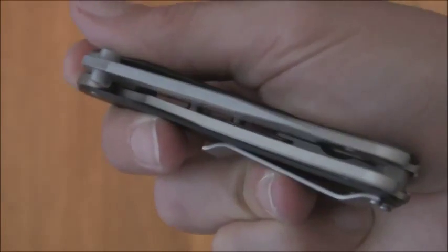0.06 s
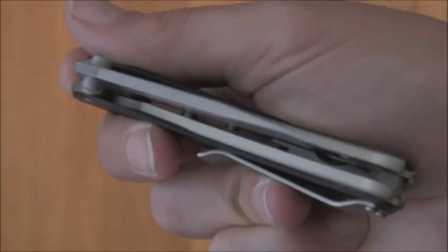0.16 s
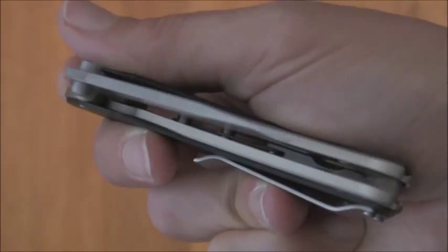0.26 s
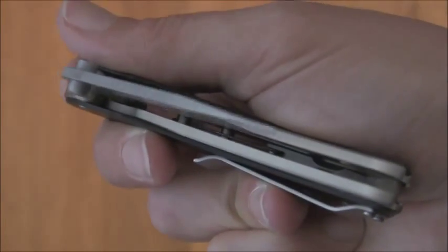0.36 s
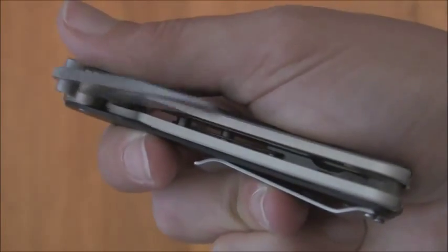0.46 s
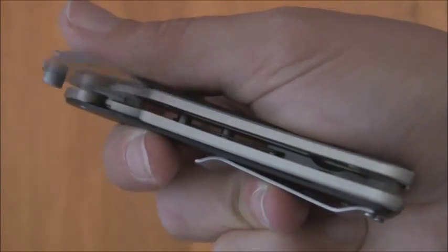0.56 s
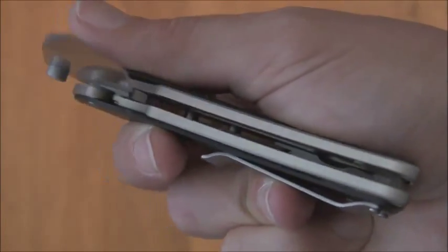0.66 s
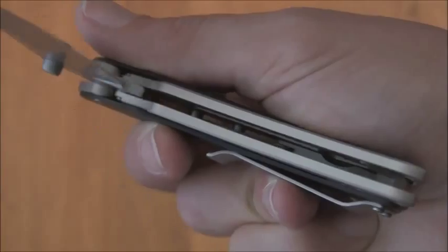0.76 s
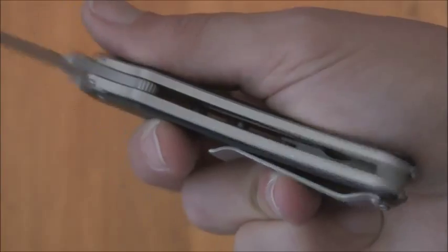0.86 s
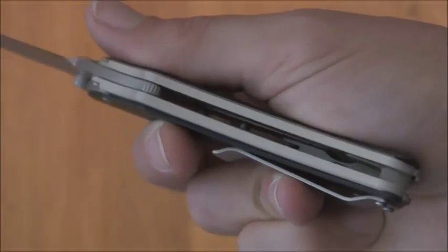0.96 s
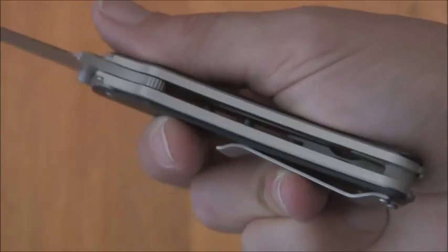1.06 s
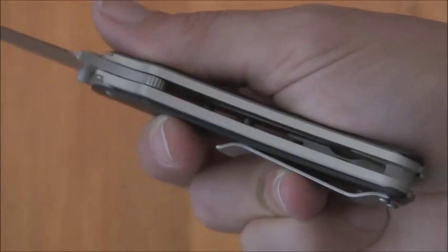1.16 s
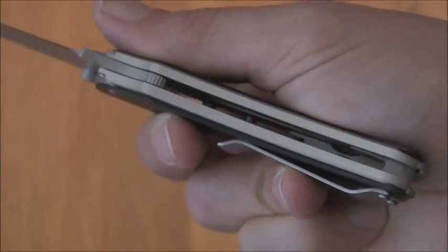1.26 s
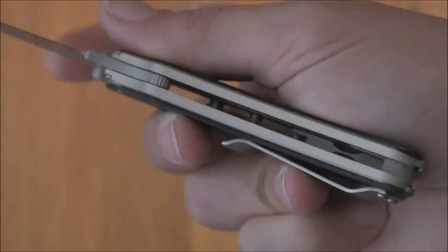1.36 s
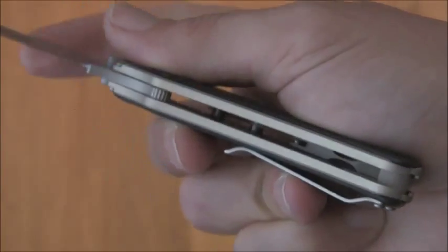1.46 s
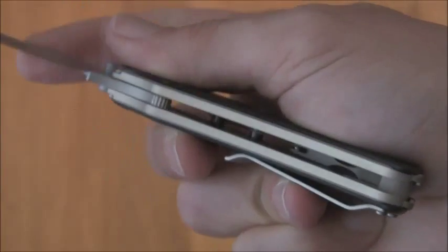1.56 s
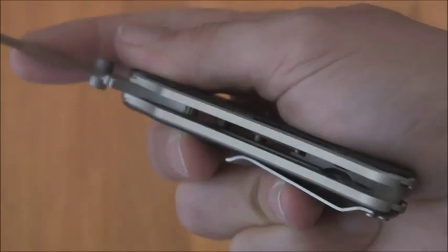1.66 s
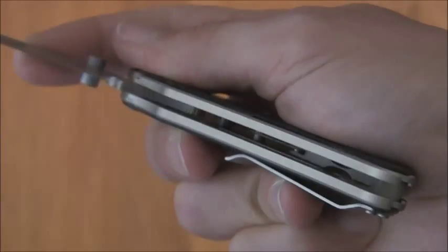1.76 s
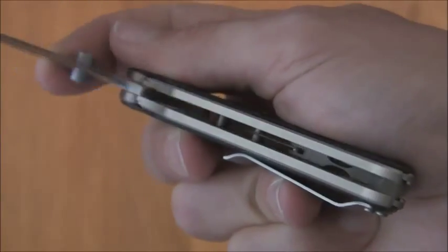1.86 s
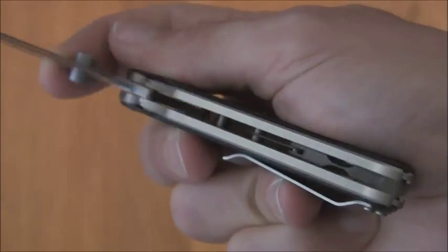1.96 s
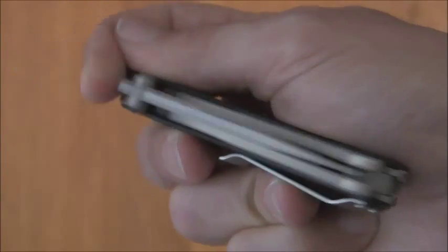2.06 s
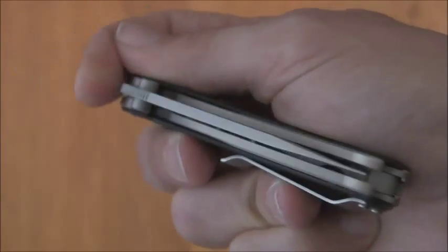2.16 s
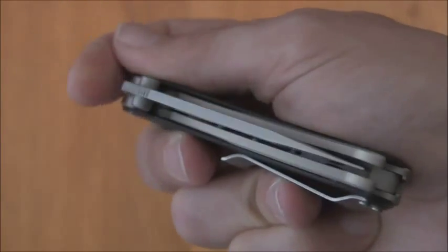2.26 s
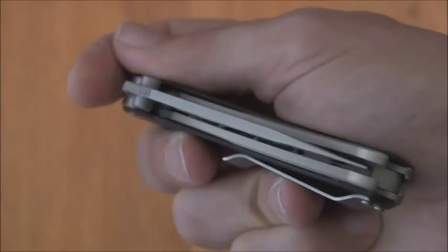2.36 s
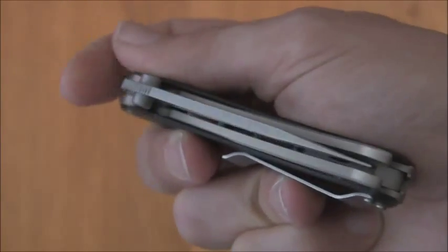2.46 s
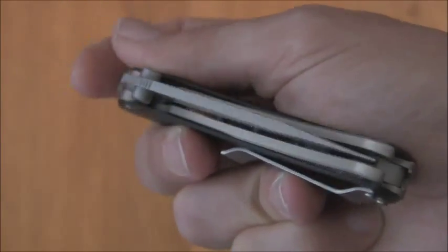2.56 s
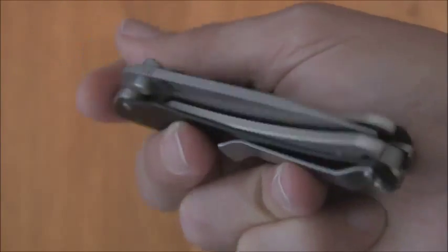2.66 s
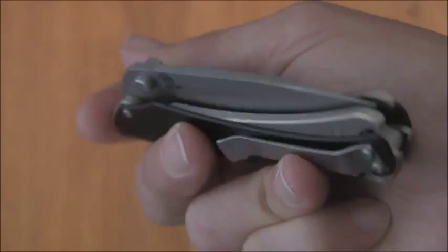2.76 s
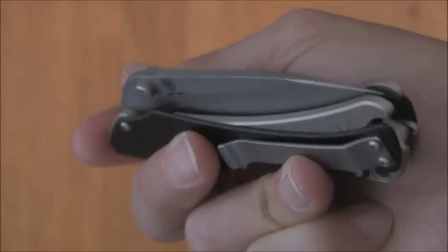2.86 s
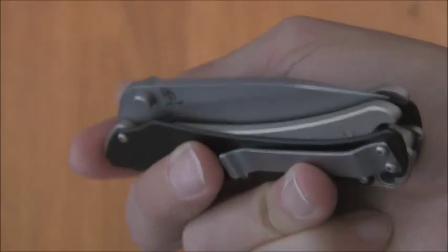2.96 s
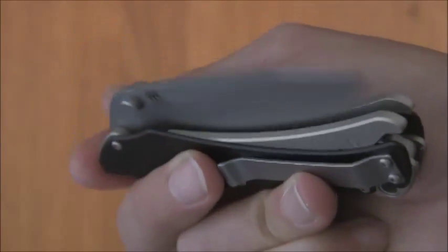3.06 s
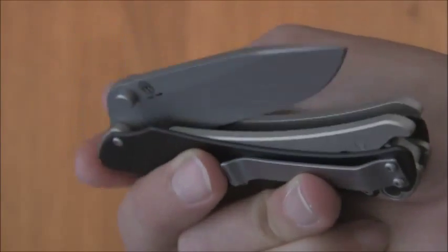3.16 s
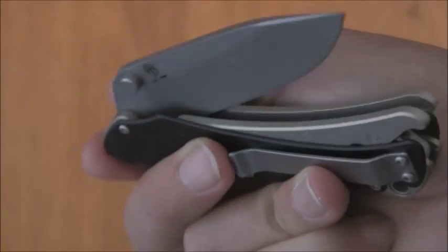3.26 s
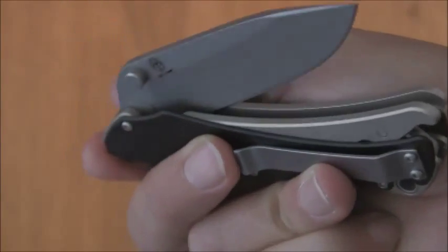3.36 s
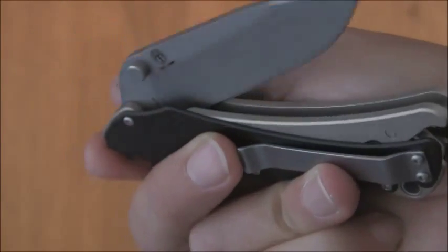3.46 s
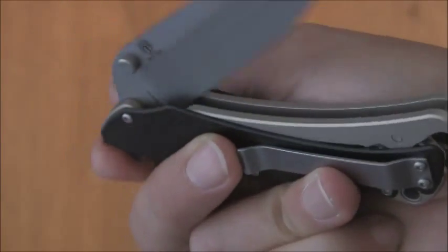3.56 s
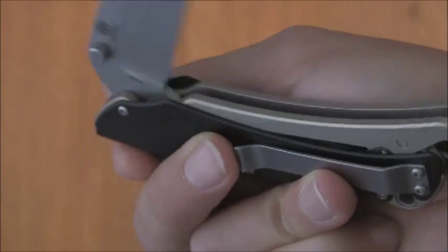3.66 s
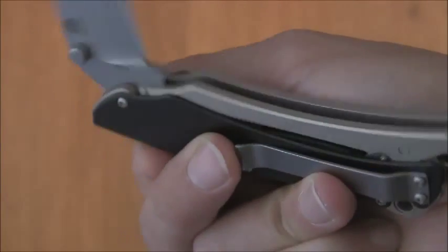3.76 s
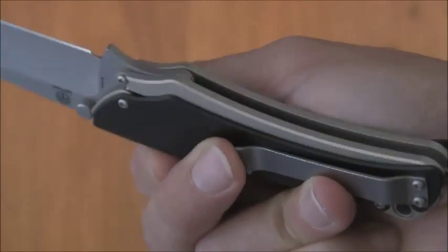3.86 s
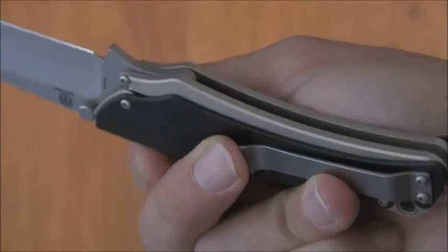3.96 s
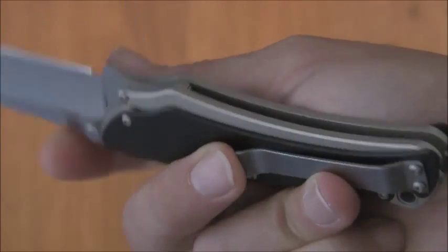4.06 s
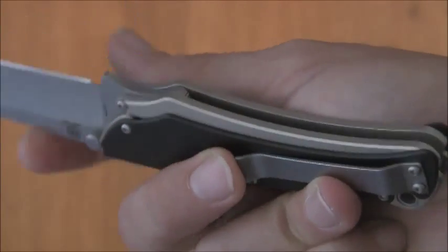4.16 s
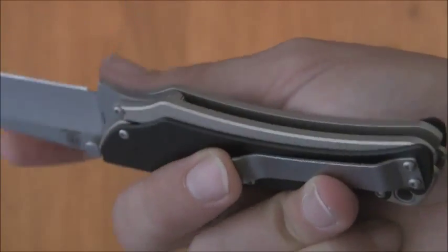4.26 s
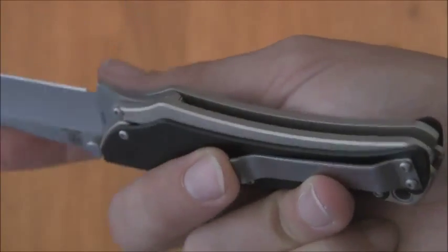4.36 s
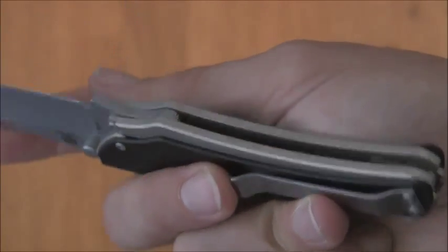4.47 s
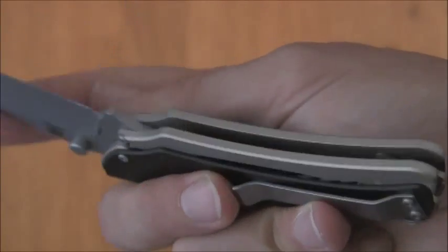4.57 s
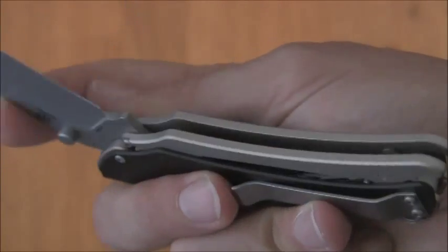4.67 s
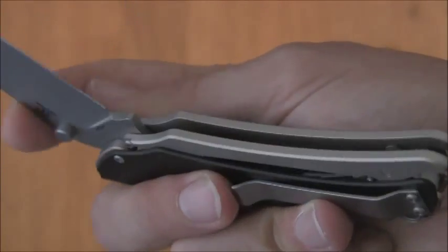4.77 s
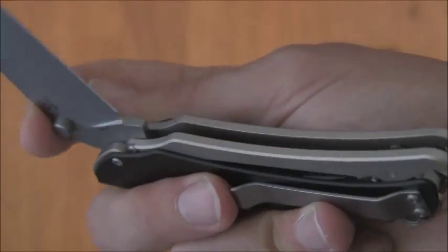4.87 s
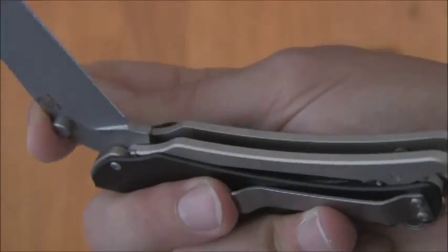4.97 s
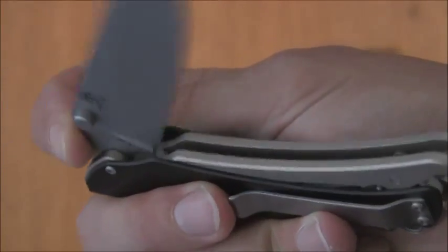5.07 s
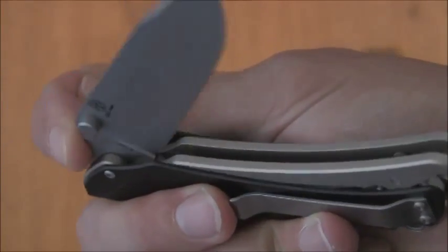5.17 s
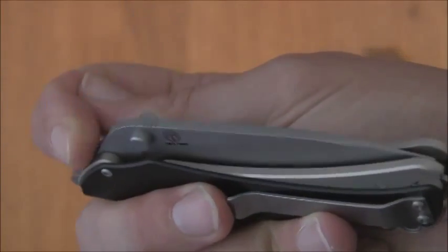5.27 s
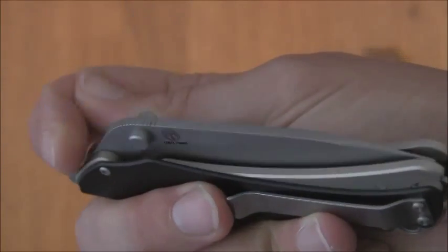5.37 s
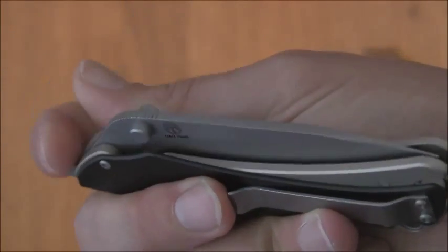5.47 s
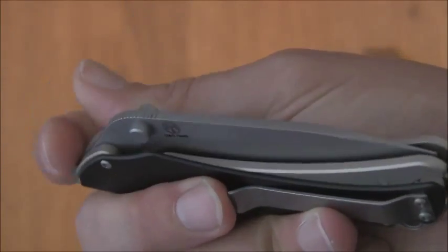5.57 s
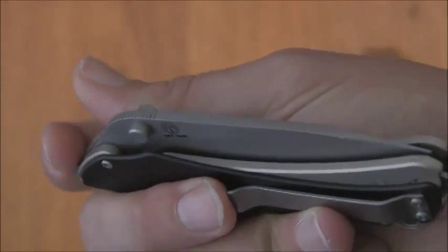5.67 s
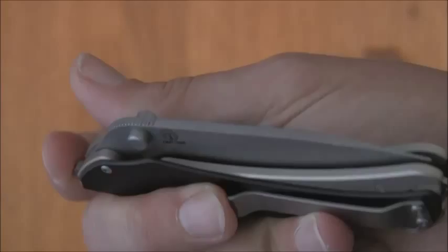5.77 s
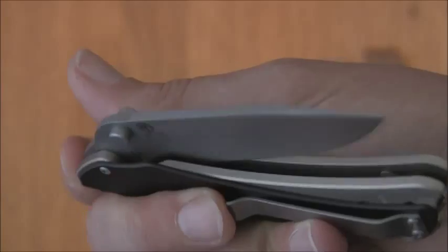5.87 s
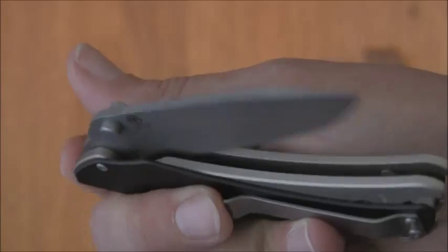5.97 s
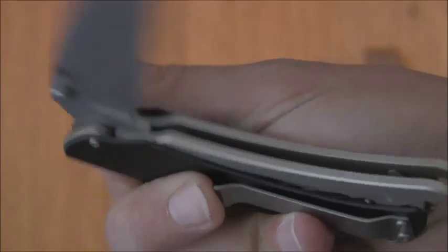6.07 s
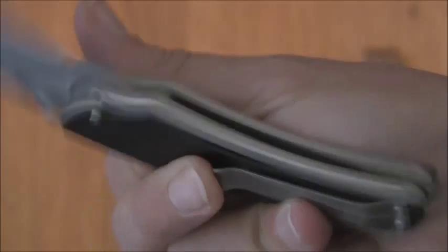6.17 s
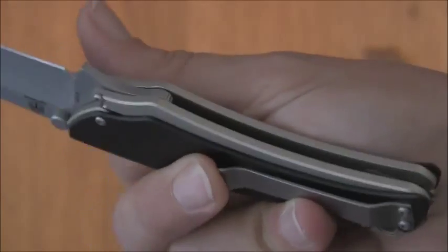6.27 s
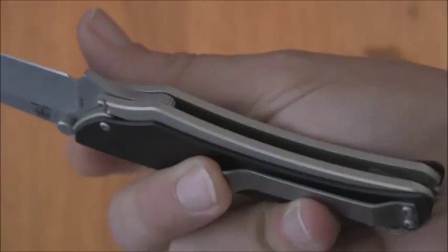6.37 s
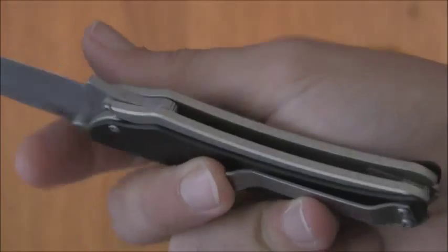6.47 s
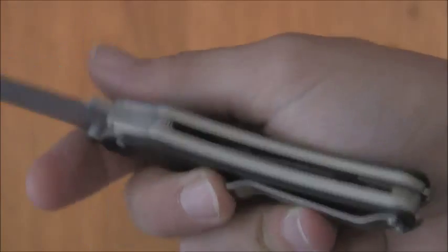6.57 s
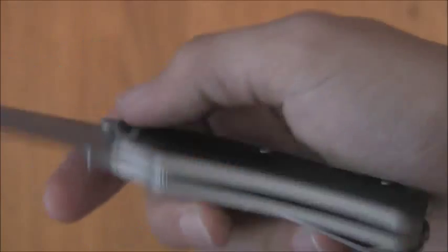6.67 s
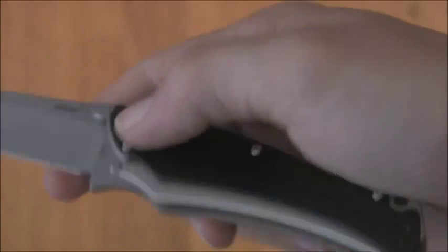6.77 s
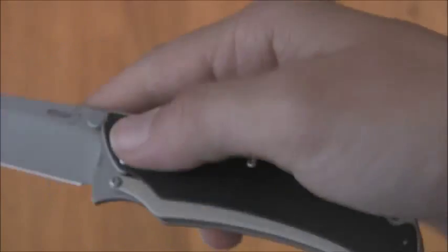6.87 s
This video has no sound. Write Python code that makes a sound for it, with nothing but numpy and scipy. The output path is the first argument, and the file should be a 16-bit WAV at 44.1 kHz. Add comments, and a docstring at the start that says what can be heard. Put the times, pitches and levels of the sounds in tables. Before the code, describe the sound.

Five sharp, close metallic snaps of a pocket knife opening and closing, with faint lock scrapes and ticks between them.

```python
"""Sharp metallic snaps in a small quiet room: a steel folding knife is flicked open three times, shut twice.
The blade clicks past its detent and slams on the stop pin; the lock bar scrapes aside before each closing.
Impacts and friction excite the steel's resonances, which reach a close stereo microphone directly and as
reverberation. The snaps overload the microphone and duck its gain with a soft thump, so the room's ring
lingers and the background creeps back."""
import sys
import numpy as np
from scipy import signal
from scipy.fft import rfft, irfft
from scipy.io import wavfile
from scipy.ndimage import minimum_filter1d

SR = 44100
rng = np.random.default_rng(int(sys.argv[2]) if len(sys.argv) > 2 else 0)


def to_wav(sig):
    """Store sig (one row per channel, or 1-D mono) as 16-bit WAV at the path in sys.argv[1].

    Samples outside -1..1 are clipped; the rate is SR.
    """
    pcm = np.clip(np.atleast_2d(sig), -1, 1) * 32767
    pcm = np.round(pcm).astype(np.int16)
    wavfile.write(sys.argv[1], SR, pcm.T)  # frames by channels


N = 305613
TIME = np.arange(N) / SR
MS = 1 / 1000
LOCK_BAR_HZ, SWISH_LEAD_MS = 4130, 2.7  # ring of the rubbed bar; a swish peaks this long before its blow

# resonances of the open knife and its small parts: pitch_hz, width_hz, level_db
STEEL_MODES = [(2300, 240, -3.5), (3600, 200, -6), (4650, 450, -1.5), (5800, 220, 0.5), (7150, 330, -7),
               (8000, 350, -1), (11400, 200, -5), (12550, 180, -2.5)]
# radiation spectrum of lock bar, detent and pivot: frequency_hz, level_db
PART_SPECTRUM = [(200, -44), (1400, -35), (1900, -18.5), (2400, -8), (4200, -7), (5500, -2.5), (8000, 1),
                 (12000, 4), (16000, -2.5)]
# left-right coherence of the direct sound: frequency_hz, coherence
DIRECT_COHERENCE = [(1500, 1), (3000, 0.6), (6000, 0.3), (12000, 0.17)]


def openings(walls, lock_lead_ms=7):
    """Impact excitation: the blade swishes out, the lock bar clicks, the stop pin's blow jolts the handle."""
    # blows on the stop pin: start_s, level_db, tilt_db_per_octave, ring_hz, knock_db, lock_db, lock_hz,
    # room_db
    flicks = [(0.9145, 3, 0.55, 8000, -17.5, -11.5, 7900, 2), (3.8403, 3.5, 2, 2200, -18, -15.5, 3700, 1.5),
              (6.2002, 3, 1.27, 2330, -19, -6, 4200, -0.5)]
    # radiation spectrum of the free blade, weak below 2 kHz: frequency_hz, level_db
    blade_spectrum = [(200, -30.5), (700, -28.5), (1400, -20), (1950, -10.5), (2230, -4.5), (2700, -6),
                      (3500, -1.5), (5100, -3.5), (7000, -2), (11500, 0), (13000, -6), (14400, 3.5),
                      (16000, -14.5)]
    # dull knock of the handle: frequency_hz, level_db
    knock_spectrum = [(80, -36), (250, -15), (480, -4), (800, 0.5), (1500, 2), (2500, -17), (6000, -66.5)]
    bar = small_part(tilt=-6.5, ring_hz=LOCK_BAR_HZ)
    handle = modal_response(knock_spectrum, [], ring_db=0, tilt=0)
    for s, db, tilt, ring_hz, knock_db, lock_db, lock_hz, room_db in flicks:
        grip_mode = (ring_hz, 260, 2)  # the grip decides which resonance rings most
        blade = modal_response(blade_spectrum, [*STEEL_MODES, grip_mode], ring_db=3, tilt=tilt)
        blade = rebound(blade, delay_ms=0.86)
        catch = small_part(tilt=-1.5, ring_hz=lock_hz)
        yield friction(bar, walls, s - SWISH_LEAD_MS * MS, db=-27.5,
                       rise_ms=15.7, fall_ms=1.5, grain_db=2, room_db=-17)
        yield s - lock_lead_ms * MS, impact(catch, walls, lock_db, decay_ms=2.4, pan_db=0, room_db=-17.5)
        yield s, impact(blade, walls, db, decay_ms=0.77, pan_db=4, room_db=room_db)
        yield s, impact(handle, walls, knock_db, decay_ms=0.5, pan_db=-6.5, room_db=-28)


def closings(walls):
    """Impact excitation: the blade swishes between the liners, snaps home and rings the shut knife's modes."""
    # closing blows: start_s, level_db, tilt_db_per_octave, ring_hz, decay_ms, pan_db, room_db
    snaps = [(2.1056, 4.5, -0.5, 8150, 4.3, 10.2, -2.5), (5.2811, -0.5, -0.04, 2330, 1.74, -4, -1)]
    # resonances of the shut knife: pitch_hz, width_hz, level_db
    shut_modes = [(4410, 120, -4), (5850, 130, -3), (6300, 49, -5), (6660, 66, -3), (7080, 54, -2),
                  (8410, 520, 0), (9670, 77, -6), (10500, 47, -5), (11200, 110, -1), (11700, 150, -4),
                  (14000, 49, -8), (14400, 28, -9)]
    # radiation spectrum of the shut knife: frequency_hz, level_db
    shut_spectrum = [(200, -45.5), (1000, -25), (1850, -30.5), (2300, -6.5), (3200, -12.5), (4200, -3),
                     (5000, -6.5), (7500, -2), (10000, -5), (13000, 1), (16000, -14.5)]
    handle = small_part(tilt=-3.1, ring_hz=2600)
    for s, db, tilt, ring_hz, decay_ms, pan_db, room_db in snaps:
        grip_mode = (ring_hz, 300, 0)
        knife = modal_response(shut_spectrum, [*shut_modes, grip_mode], ring_db=3, tilt=tilt)
        yield friction(handle, walls, s - SWISH_LEAD_MS * MS, db - 34.5,
                       rise_ms=24, fall_ms=3.7, grain_db=7.5, room_db=-21)
        yield s, impact(rebound(knife, delay_ms=0.72), walls, db, decay_ms, pan_db, room_db)


def lock_releases(walls, squeak_lead_ms=2.8):
    """Stick-slip: the lock bar squeaks under the thumb, clicks free and scrapes across the blade's heel."""
    # thumb pushes: slip_s, level_db, tilt_db_per_octave, ring_hz, scrape_delay_ms
    pushes = [(1.6404, -25.5, -4, 3310, 5.5), (4.5516, -30, -7, 4190, 9)]
    squeak = modal_response(PART_SPECTRUM, [(LOCK_BAR_HZ, 180, 26)], ring_db=1, tilt=-9.5)
    for s, db, tilt, ring_hz, scrape_delay_ms in pushes:
        bar = small_part(tilt, ring_hz)
        yield friction(squeak, walls, s - squeak_lead_ms * MS, db - 0.5,
                       rise_ms=3.8, fall_ms=2.5, grain_db=-0.5, room_db=-14)
        yield s, impact(bar, walls, db + 1.5, decay_ms=0.9, pan_db=-11, room_db=-15)
        yield friction(bar, walls, s + scrape_delay_ms * MS, db,
                       rise_ms=10, fall_ms=6.5, grain_db=7, room_db=-5.5)


def handling(walls):
    """Light contacts and friction excite the small parts faintly between the snaps."""
    # ticks of detent ball and grip: start_s, level_db, tilt_db_per_octave, ring_hz
    ticks = [(0.609, -42, -5, 6000), (.8553, -38.5, -10.5, 2700), (2.8424, -40, -1, 8400),
             (3.6664, -43, -7.5, 7700), (5.072, -37, -0.5, 7100), (5.2330, -43, 0, 10600),
             (6.0868, -44, -7, 3500)]
    # the blade turns slowly on its pivot, or fingers shift: peak_s, level_db, tilt_db_per_octave, ring_hz
    rubs = [(1.853, -53, -2, 6900), (5.095, -50.5, 0.5, 7000), (5.246, -46, 2, 10600),
            (5.903, -47.5, -7, 2470), (6.094, -47.5, -6.5, 4280), (6.744, -51, -9.5, 6800)]
    for s, db, tilt, ring_hz in ticks:
        yield s, impact(small_part(tilt, ring_hz), walls, db, decay_ms=2.5, pan_db=0, room_db=-0.5)
    for s, db, tilt, ring_hz in rubs:
        yield friction(small_part(tilt, ring_hz), walls, s, db,
                       rise_ms=21.6, fall_ms=20, grain_db=2.5, room_db=-2)


def impact(body, walls, db, decay_ms, pan_db, room_db, size=2048):
    """Broadband excitation: brief steel-on-steel chatter drives all modes; db is its level over 1 ms."""
    # gain of the direct path: frequency_hz, gain_db
    direct_gain = [(1000, 1.86), (3000, 2), (6000, 0.38), (9000, -1), (14000, 0.5)]
    # level difference on the direct path: frequency_hz, left_minus_right_db
    direct_pan = [(1000, -2), (2400, 6), (4500, 0), (8000, -6), (14000, -6)]
    hz = np.fft.rfftfreq(size, 1 / SR)
    direct_db = along(direct_gain, hz) + np.outer([1, -1], along(direct_pan, hz) + pan_db) / 2
    decay = np.exp(-TIME[:size] / (decay_ms * MS))
    contacts = rfft(irfft(noise_spectra(DIRECT_COHERENCE, size)) * decay)
    chatter = unit(irfft(contacts / np.abs(contacts)))  # flat spectrum
    paths = undb(room_db) * walls
    paths[:, :size // 2] += irfft(rfft(chatter) * undb(direct_db))[:, :size // 2]
    return undb(db) * np.sqrt(MS * SR) * signal.fftconvolve(paths, body[None], axes=1)


def friction(body, walls, peak_s, db, rise_ms, fall_ms, grain_db, room_db, size=16384):
    """Sliding friction: dense tiny slips swell and fade, driving the body; returns (start_s, sound)."""
    t = TIME[:size] - size / 2 / SR
    swell = np.exp(-np.where(t < 0, (t / (rise_ms * MS)) ** 2, t / (fall_ms * MS)))
    slips = irfft(noise_spectra(DIRECT_COHERENCE, size)) * undb(grain_db * rng.standard_normal(size))
    force = unit(slips) * np.sqrt(size) * swell * undb(db)
    direct = signal.fftconvolve(force, body[None], axes=1)
    sound = undb(room_db) * signal.fftconvolve(direct, walls, axes=1)
    sound[:, :direct.shape[1]] += direct
    return peak_s + t[0], sound


def modal_response(spectrum, modes, ring_db, tilt, size=4096):
    """Minimum-phase impulse response: resonance peaks on a broad spectrum; tilt is in dB per octave."""
    hz = np.fft.rfftfreq(size, 1 / SR)
    peaks = sum(undb(db + ring_db) ** 2 / (1 + (2 * (hz - f) / width) ** 2) for f, width, db in modes)
    tilt_db = tilt * np.log2(np.maximum(hz, 2000))
    magnitude = undb(along(spectrum, hz) + tilt_db) * np.sqrt(1 + peaks)
    cepstrum = irfft(np.log(magnitude))
    cepstrum[1:size // 2] *= 2  # folding the cepstrum makes the response causal
    cepstrum[size // 2 + 1:] = 0
    return unit(irfft(np.exp(rfft(cepstrum)))[:size // 2])


def small_part(tilt, ring_hz):
    """Dominant resonance: in lock bar, detent or pivot one broad mode stands above the rest."""
    return modal_response(PART_SPECTRUM, [*STEEL_MODES, (ring_hz, 520, 10.5)], ring_db=-2.5, tilt=tilt)


def rebound(body, delay_ms, level_db=-15.5, cutoff_hz=10700):
    """Comb filtering: a second, softer contact interferes with the first and ripples its spectrum."""
    hz = np.fft.rfftfreq(len(body), 1 / SR)
    second_contact = undb(level_db) * np.exp(-(hz / cutoff_hz) ** 2 - 2j * np.pi * hz * delay_ms * MS)
    return unit(irfft(rfft(body) * (1 + second_contact)))


def reverberation(build_ms=3, early_ms=10, size=32768):
    """Diffuse field, unrelated left and right: desk and hand reflect first, the top treble dies soonest."""
    # reverberation times: frequency_hz, t60_s
    decay_times = [(1000, 0.39), (2500, 0.57), (5000, 0.56), (8500, 0.47), (12000, 0.41), (16000, 0.27)]
    t, hz = TIME[:size], np.fft.rfftfreq(size, 1 / SR)
    noise = rfft(rng.standard_normal((2, size)))
    centres, t60s = np.transpose(decay_times)
    bands = (irfft(noise * np.interp(hz, centres, share)) for share in np.eye(len(centres)))
    tail = sum(band * np.exp(-np.log(1000) * t / t60) for band, t60 in zip(bands, t60s))
    build_up = 1 - np.exp(-t / (build_ms * MS))
    early_boost = 1 + np.exp(-t / (early_ms * MS))
    return unit(tail * build_up * early_boost)


def background(air_db=-46.5, waver=0.28, waver_ms=60, pan_db=-2.5):
    """Ambient noise: a low steady rush and a faint hum, randomly modulated in amplitude and phase."""
    # spectral density of the room's noise: frequency_hz, relative_db
    air_spectrum = [(15, -44), (25, -14), (102, -3), (170, -2), (200, 0), (293, -5), (439, -7), (560, -14),
                    (695, -12), (863, -16), (2160, -24), (2910, -25), (11300, -33), (14800, -37),
                    (16000, -43)]
    # left-right coherence of that noise: frequency_hz, coherence
    air_coherence = [(40, 0.21), (150, 0.05), (600, .3), (2000, 0.3), (8000, 0.061)]
    # tones of the hum: pitch_hz, level_db
    hum_tones = [(149, -59), (200, -71)]
    colour = undb(along(air_spectrum, np.fft.rfftfreq(N, 1 / SR)))
    air = undb(air_db) * np.sqrt(N) * unit(irfft(noise_spectra(air_coherence, N) * colour, N))
    for hz, db in hum_tones:
        drift, swell = np.sqrt(N) * unit(lag(rng.standard_normal((2, N)), waver_ms))
        air += undb(db) * np.sqrt(2) * (1 + waver * swell) * np.sin(2 * np.pi * hz * TIME + drift)
    return air * undb([[pan_db / 2], [-pan_db / 2]])


def gain_control(x, threshold_db=-14, attack_ms=3.1, hold_ms=50, thump_db=-55.5, thump_s=0.065):
    """Compression: peaks cut the gain, which returns fast, then slowly; each cut leaks a soft thump."""
    envelope = lag(np.abs(x).max(axis=0), ms=0.36)
    over_db = np.maximum(20 * np.log10(envelope + 1e-9) - threshold_db, 0)
    half = int(hold_ms * MS * SR / 2)
    held_db = -minimum_filter1d(-over_db, 2 * half + 1, origin=half)
    cut_db = np.maximum(recover(held_db, per_s=72), recover(0.5 * held_db, per_s=4.5))
    offset = undb(thump_db) * recover(np.minimum(held_db, 1), per_s=1 / thump_s)
    return x * undb(-lag(cut_db, attack_ms)) - lag(offset, attack_ms)


def recover(cut, per_s):
    """Peak detection: a cut takes hold at once and lets go at a steady rate."""
    return np.maximum.accumulate(cut + per_s * TIME) - per_s * TIME


def noise_spectra(coherence, size):
    """Partial coherence: left and right spectra are the sum and difference of two independent noises."""
    alike = np.clip(along(coherence, np.fft.rfftfreq(size, 1 / SR)), 0, 1)
    mid, side = rfft(rng.standard_normal((2, size))) * np.sqrt([1 + alike, 1 - alike])
    return np.array([mid + side, mid - side])


def undb(db):
    """Decibels to amplitude ratio."""
    return 10 ** (np.asarray(db) / 20)


def unit(x):
    """Normalisation of each channel to energy 1."""
    return x / np.sqrt(np.sum(x ** 2, axis=-1, keepdims=True))


def along(points, hz):
    """Interpolation of (frequency_hz, value) points on a log-frequency axis."""
    f, value = np.transpose(points)
    return np.interp(np.log(hz + 1), np.log(f), value)


def lag(x, ms):
    """One-pole low-pass with time constant ms."""
    keep = np.exp(-1 / (ms * MS * SR))
    return signal.lfilter([1 - keep], [1, -keep], x)


def scene():
    """Superposition: the knife's sounds share one room response and add to the background."""
    out = background()
    walls = reverberation() * undb([[-0.7], [0.7]])
    for source in (openings, closings, lock_releases, handling):
        for start_s, sound in source(walls):
            i = int(start_s * SR)
            out[:, i:i + sound.shape[1]] += sound[:, :N - i]
    return out


def record(dry, hiss_db=-59.5, top_hz=16200):
    """Overload: a snap's first millisecond outruns the gain control and clips; the electronics hiss."""
    # spectral density of the microphone's self-noise: frequency_hz, relative_db
    hiss_spectrum = [(100, 2), (1000, 5), (3000, 1), (8000, -4.5), (16000, -10.5)]
    colour = undb(along(hiss_spectrum, np.fft.rfftfreq(N, 1 / SR)))
    hiss = irfft(rfft(rng.standard_normal((2, N))) * colour, N)
    captured = np.clip(gain_control(dry), -1, 1) + undb(hiss_db) * np.sqrt(N) * unit(hiss)
    return signal.fftconvolve(captured, signal.firwin(255, top_hz, fs=SR)[None], "same", axes=1)


dry = scene()
out = record(dry)
to_wav(out)
```